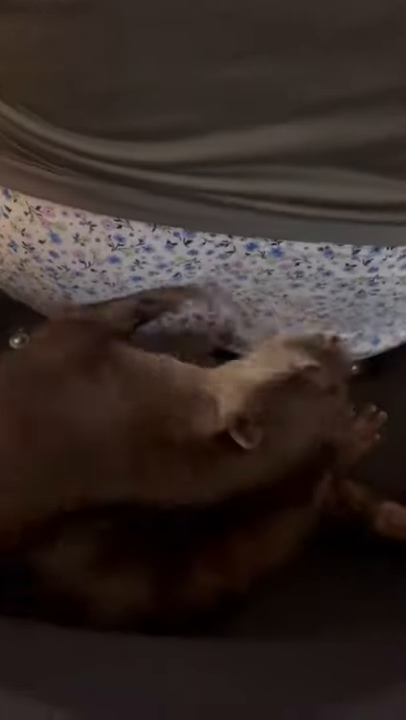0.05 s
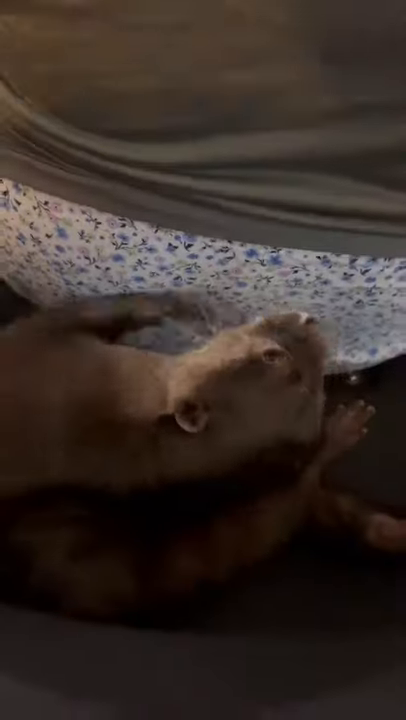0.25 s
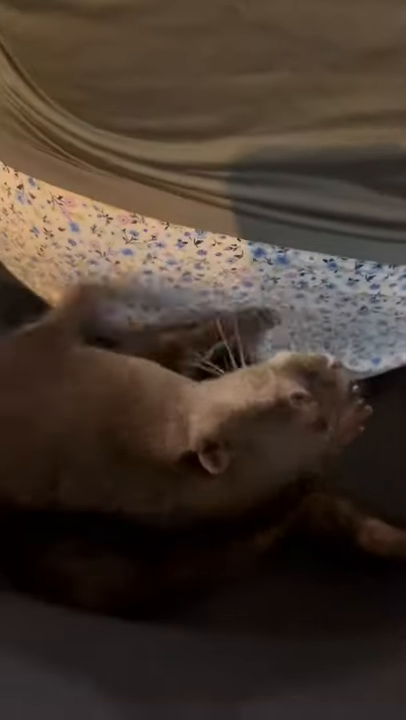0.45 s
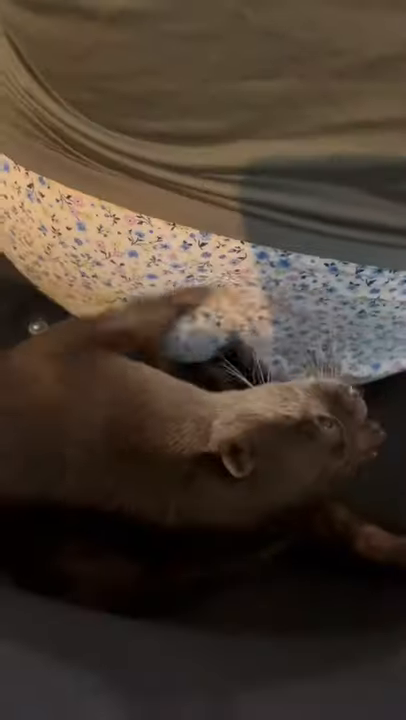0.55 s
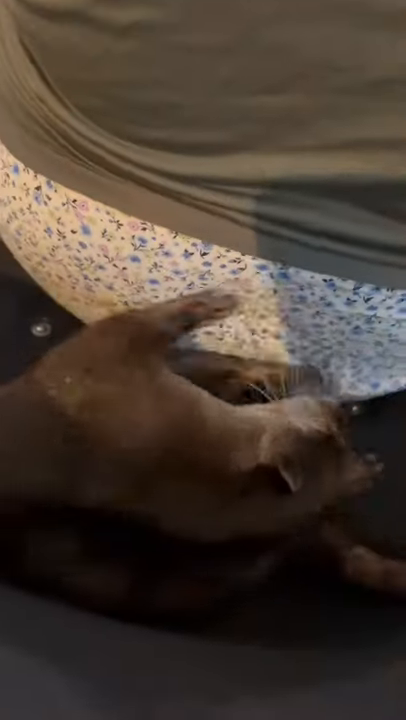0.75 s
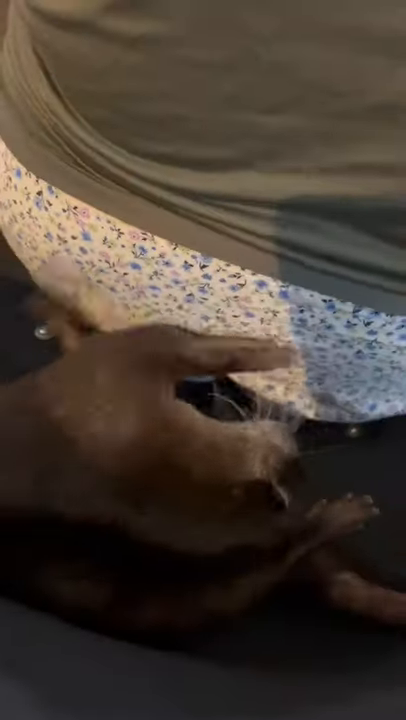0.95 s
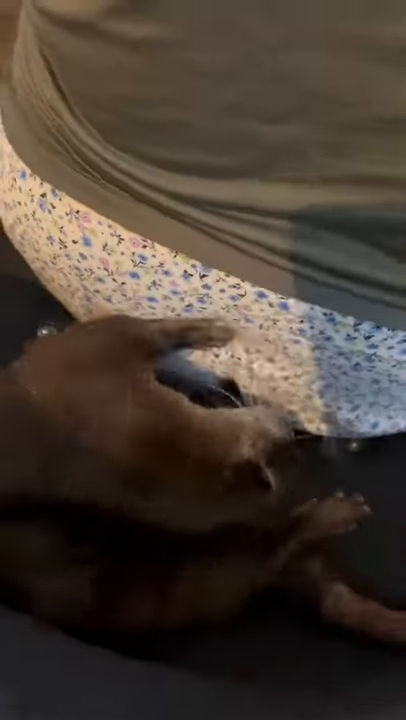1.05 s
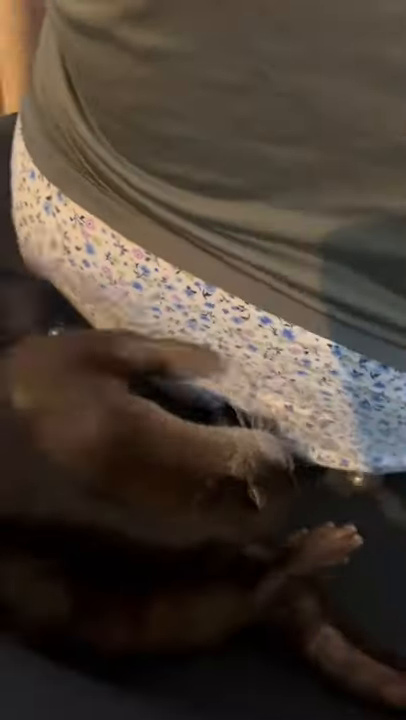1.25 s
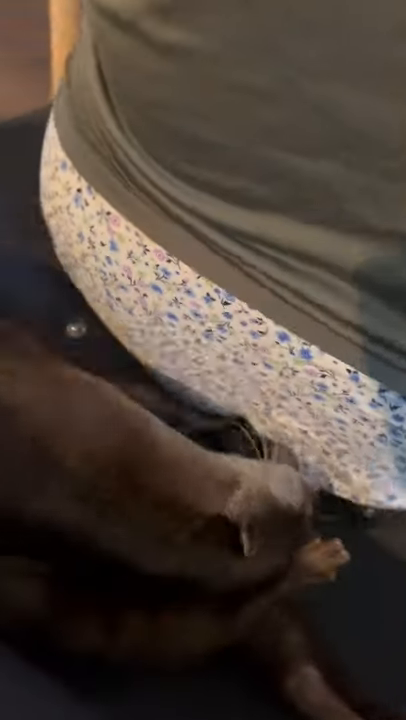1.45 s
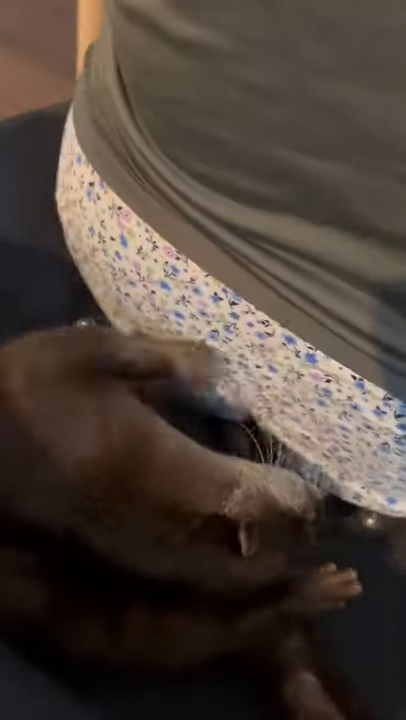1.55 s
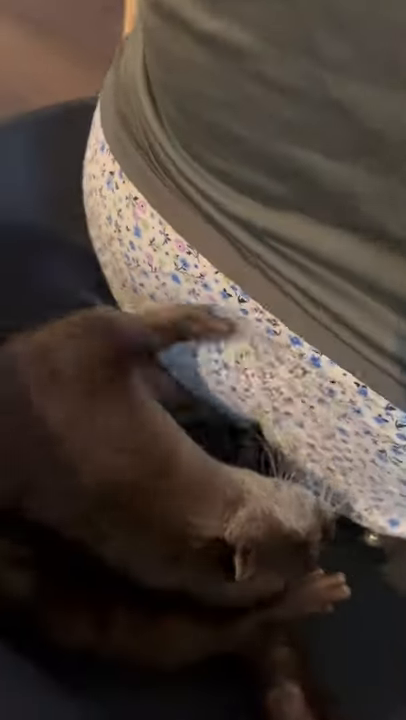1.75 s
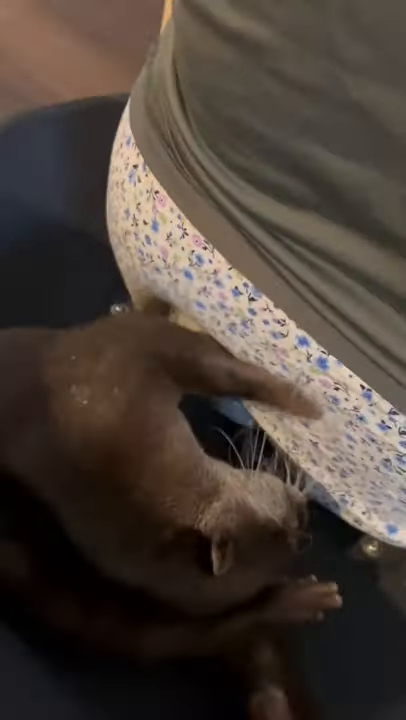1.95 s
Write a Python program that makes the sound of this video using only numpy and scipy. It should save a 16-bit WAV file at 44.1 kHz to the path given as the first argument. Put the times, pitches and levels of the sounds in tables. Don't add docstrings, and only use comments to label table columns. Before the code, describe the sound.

An otter squeals once near the start, rough then clear, with a short room echo; quiet fabric brushing follows, then soft pats and tiny claw ticks over low room hum, picked up by a close handheld phone.

```python
import sys
import numpy as np
from scipy import signal
from scipy.fft import rfft, irfft
from scipy.io import wavfile
from scipy.ndimage import uniform_filter1d

SR = 44100
rng = np.random.default_rng(int(sys.argv[2]) if len(sys.argv) > 2 else 0)


def level_to_linear(level):
    exponent = np.asarray(level, float) / 20
    return 10 ** exponent


def master(y):
    cut = np.clip(np.atleast_2d(y).T, -1, 1)
    pcm = np.round(cut * 32767)
    wavfile.write(sys.argv[1], SR, pcm.astype(np.int16))


N = 88200
T = np.arange(N) / SR

# freq_hz, level_db
AIR_COLOUR = [(40, -21), (150, -19), (500, -21.5), (1400, -29), (4400, -38.5), (7000, -40), (12500, -42),
              (16000, -41)]
# freq_hz, level_db
RUMBLE_COLOUR = [(25, -21), (45, -22), (70, 7.5), (95, -6), (125, 1.5), (200, -5.5), (450, -16), (800, -45)]
# time_s, level_db
SHIFTING = [(0, -80), (.17, -72.5), (.6, -68.5), (.87, -69.5), (.94, -66.5), (1.0, -75.5), (1.12, -67),
            (1.4, -67.5), (1.55, -59), (1.69, -62), (1.8, -59.5), (2, -60)]
# freq_hz, correlation_0_1
ALIKE = [(60, .99), (130, .95), (270, .7), (600, .5), (1200, .7), (3000, .5), (6500, .7), (12500, .85)]
AIR_DB = -67.5

# start_s, level_db, t60_s, dullness_db
PATS = [
    (1.456, -50, 0.67, -1.5),
    (1.558, -61.5, 0.65, 17),
    (1.701, -49.5, 1, -1.4),
    (1.813, -93, 1, 34),
]
# freq_hz, level_db
PAT_COLOUR = [(150, -52), (250, -44), (478, -30), (650, -5), (1530, -6), (3620, -10), (12000, -28.5),
              (15600, -70), (22000, -120)]
# start_s, peak_db, pitch_hz
TICKS = [
    (1.4655, -41, 3900),
    (1.4655, -43, 2500),
    (1.7135, -41, 1900),
    (1.714, -38, 3350),
    (1.779, -41, 3150),
    (1.788, -43, 3700),
]
# mid_s, length_s, mid_hz, climb_hz_per_s, level_db
FLICK = (1.7975, .007, 6400, 400000, -46)

# end_s, length_s, level_db, whistle_db, grip_db
STROKES = [
    (0.121, 0.11, -65, -24, 0.5),
    (0.621, 0.12, -58, -14.5, -15),
    (0.828, 0.098, -63.5, -28, -1),
    (0.957, 0.15, -61.5, -5, -35),
    (1.129, 0.087, -62, -26, 3.5),
    (1.257, 0.13, -61.5, -11, -1.5),
    (1.441, 0.12, -62.5, -13, 4),
    (1.616, 0.13, -59, -4.5, -16),
    (1.805, 0.095, -52.5, -6.5, -11.5),
    (1.968, .11, -60.5, -3, 0.5),
]
# freq_hz, level_db
CLOTH_COLOUR = [(800, -17), (2200, -9), (3570, -5.5), (4930, -8), (6980, -6), (10000, -12), (12500, -3),
                (16000, -20.5)]
SWELL_DB, STOP_S = -11, 0.0067
WHISTLE_LO_HZ, WHISTLE_HI_HZ, WHISTLE_WIDTH_HZ = 2540, 9240, 800
GRIP_BEFORE_S, GRIP_S, GRIP_HZ, GRIP_WIDTH_HZ = 0.03, 0.023, 4130, 1300
SEAM_S, SEAM_DB, SEAM_HZ, SEAM_WIDTH_HZ, SEAM_T60_S = 1.706, -57, 3300, 230, .8

# freq_hz, t60_s
WALL_DECAY = [(500, 0.99), (1000, 0.5), (2500, 0.54), (4000, 0.77), (7000, 0.16), (11000, 0.099)]
WALLS_DB, PATH_TURN_HZ = -25.5, 17

# time_s, pitch_hz, effort_db
START = [
    (.213, 549.5, -71),
    (.224, 546.2, -33.5),
    (.246, 610.3, -22.5),
    (.262, 585.6, -25.5),
    (.272, 493, -22),
    (.28, 524.3, -23.5),
    (.289, 598.4, -23),
    (.298, 629.2, -25),
]
# time_s, pitch_hz, effort_db
GROWL = [
    (0.308, 572, -22.5),
    (0.319, 560, -33.5),
    (0.331, 560, -28.5),
    (0.348, 538, -26.5),
    (.353, 519.7, -39),
    (0.36, 541.5, -26),
]
# time_s, pitch_hz, effort_db
NOTE = [
    (.372, 540.7, -24),
    (.388, 538, -24.5),
    (.395, 566, -23.5),
    (.414, 555.3, -23),
    (.436, 529.3, -23.5),
    (.46, 529.9, -22),
    (.481, 529, -25.5),
    (.488, 525, -39),
    (.503, 486, -54),
]
# time_s, roughness_0_1, half_pitch_0_1, mouth_opening_ratio
FOLDS = [
    (0.213, 0.12, 0.18, 0.85),
    (0.261, 0.25, 0.31, 0.97),
    (0.288, 0.29, 0.08, 1),
    (0.303, 0.8, 0.98, 1),
    (0.361, 0.45, 0.7, 1.037),
    (0.381, 0.2, 0, .99),
    (0.401, 0.09, 0, 1.041),
    (0.485, 0.09, 0.05, 1.117),
    (0.497, 0.54, 0.2, 0.8),
]
# freq_hz, width_hz, level_db, gain_when_clear_db
THROAT = [(270, 69, -52, -9.5), (560, 304, -60.5, -5.3), (970, 580, -8, 0.2), (2322, 935, -1, 3.33),
          (2554, 795, 3.5, -0.86), (3482, 970, -6.5, 3.5), (3560, 490, -22.5, 15), (4116, 150, -10, -8),
          (6014, 830, -17.5, 6), (7150, 770, -25, -5.5), (8000, 1200, -25.5, -2.5),
          (9550, 1900, -31.5, 1.3), (12800, 4000, -35, -3)]
# freq_hz, width_hz, level_db
POCKETS = [(5250, 400, -12), (9150, 450, -13), (11500, 900, -8)]
# mid_s, length_s, level_db
SPURTS = [
    (0.246, .008, -12),
    (0.268, .009, 6),
    (0.283, .006, 0.5),
    (0.304, .007, 4),
    (0.316, .005, 9.5),
    (0.327, .007, 9),
    (0.35, .006, 5.5),
    (.356, .004, 8),
    (0.372, .008, 5),
    (0.387, .01, 5),
]
# end_s, start_s, end_hz, start_hz, level_db
SLIDE = (0.3651, 0.3628, 682, 1247.5, -36.5)
# mid_s, length_s, pitch_hz, level_db
LOW_SWELLS = [
    (0.315, 0.025, 235.6, -43.5),
    (0.333, 0.014, 288.6, -39.5),
    (0.35, 0.0092, 270, -33),
    (0.362, 0.0078, 254.3, -37.5),
    (0.408, 0.079, 235.5, -54),
    (0.498, 0.025, 465, -51),
]
JITTER, PUFF_SHARE, RASP, DISPERSION_RAD = .12, .42, .22, .02
VOICE_DB, LOW_THIRD_DB = -0.96, 1.5
BRIGHT_DB, SHIMMER_DB = 30, 1.6
CLEAR_FROM_S, CLEAR_TO_S = 0.34, 0.36

# freq_hz, phase_rad
NEAR_PHASE = [(250, 0), (860, 3.1), (1720, 3.6), (1980, 5.5), (3790, 4.6), (5600, 6.2), (8900, 5.5),
              (12000, 3.1)]
# freq_hz, level_db
NEAR_PAN = [(200, 4.5), (350, -9), (600, 12.5), (1150, 14.5), (2090, -1.5), (2700, -5), (3770, 1),
            (6810, 3.5)]
# freq_hz, phase_rad
WIDE_PHASE = [(260, 0), (520, 2.8), (1380, 2.7), (3960, 5.5), (4910, 3.5), (5600, 6.3), (9220, 5.3),
              (13200, 3.1)]
# freq_hz, level_db
WIDE_PAN = [(60, 1.5), (350, 0), (2090, 0.0), (12300, 0)]
MID_EDGE_HZ, SIDE_GAP_LO_HZ, SIDE_GAP_HI_HZ = 12750, 5900, 7300


def evened(x):
    return x / np.sqrt(np.mean(x ** 2) + 1e-20)


def read(points, hz):
    f, value = np.transpose(points)
    return np.interp(np.log(hz + 1), np.log(f + 1), value)


def drift(count, size):
    once = uniform_filter1d(rng.standard_normal(count), size=size)
    return evened(uniform_filter1d(once, size=size))


def bump(mid_s, length_s, t=T):
    return np.exp(-(2 * (t - mid_s) / length_s) ** 2)


def resonate(x, hz, width_hz):
    turn = np.exp(2j * np.pi * np.cumsum(hz * np.ones(len(x))) / SR)
    r = np.exp(-np.pi * width_hz / SR)
    return 2 * (turn * signal.lfilter([(1 - r) ** 2], [1, -2 * r, r * r], x / turn + 1e-18)).real


def hiss(colour, patchy_db, size=512):
    hz = np.fft.rfftfreq(size, 1 / SR)
    a, b, c, d, patches = rng.standard_normal((4 * N // size + 5, len(hz), 5)).T
    patches = uniform_filter1d(patches, size=6, axis=0)
    patches = evened(uniform_filter1d(patches, size=5120 // size, axis=1))
    same = np.clip(read(ALIKE, hz), 0, 1)[:, None]
    left = a + 1j * b
    right = same * left + np.sqrt(1 - same ** 2) * (c + 1j * d)
    z = np.array([left, right]) * level_to_linear(read(colour, hz)[:, None] + patchy_db * patches)
    return evened(signal.istft(z, nperseg=size, noverlap=3 * size // 4)[1][:, :N])


def room():
    rumble = hiss(RUMBLE_COLOUR, patchy_db=2.5, size=2048)
    air = hiss(AIR_COLOUR, patchy_db=-0.5, size=1024)
    shift_db = np.interp(T, *np.transpose(SHIFTING))
    return level_to_linear(AIR_DB + 0.49 * (shift_db + 72.5)) * air + level_to_linear(shift_db) * rumble


def pats():
    bright = hiss(PAT_COLOUR, patchy_db=4.0)
    hollow = [(250, -21.0), (500, -10.5), (690, 0.0), (900, -12), (2500, -36.5)]  # freq_hz, level_db
    dull = hiss(hollow, patchy_db=2.0)
    out = np.zeros((2, N))
    for start_s, db, t60_s, dull_db in PATS:
        t = np.maximum(T - start_s, 0)
        rise = np.minimum(t / .007, 1)
        out += rise * level_to_linear(db - 60 * t / t60_s) * (bright + level_to_linear(dull_db - 6.5) * dull)
    return out


def claws():
    out = np.zeros(N)
    for start_s, db, tick_hz in TICKS:
        t = np.maximum(T - start_s, 0)
        out += level_to_linear(db - 60 * t / .009) * np.sin(2 * np.pi * tick_hz * t)
    mid_s, length_s, mid_hz, climb, db = FLICK
    t = T - mid_s
    out += level_to_linear(db) * bump(mid_s, length_s) * np.sin(2 * np.pi * (mid_hz + climb * t / 2) * t)
    return out * np.array([[1], [.3]])


def strokes():
    weave = hiss([(20, 0), (20000, 0)], patchy_db=1)
    fibres = hiss(CLOTH_COLOUR, patchy_db=3.5)
    pads = evened(np.array([resonate(w[::-1], GRIP_HZ, GRIP_WIDTH_HZ) for w in weave]))
    grit = level_to_linear(1.4 * evened(uniform_filter1d(rng.standard_normal(N), size=90)))
    out = np.zeros((2, N))
    for end_s, length_s, db, whistle_db, grip_db in STROKES:
        i, j = max(round((end_s - 2 * length_s) * SR), 0), round(end_s * SR)
        t = T[i:j] - end_s
        u = t / length_s + 1
        travel = np.clip(u, 0, 1)
        level = level_to_linear(db + SWELL_DB * np.maximum(.8 - u, 0)) * np.clip(-t / STOP_S, 0, 1)
        grip = level_to_linear(grip_db) * np.exp(-((t + GRIP_BEFORE_S) / GRIP_S) ** 2)
        hz = WHISTLE_LO_HZ + (WHISTLE_HI_HZ - WHISTLE_LO_HZ) * travel ** 4.7
        whistle = evened(np.array([resonate(w[i:j], hz, WHISTLE_WIDTH_HZ) for w in weave])) * travel
        rub = (1 + grip) * fibres[:, i:j] + 1.1 * grip * pads[:, i:j]
        out[:, i:j] += level * grit[i:j] * (rub + level_to_linear(whistle_db + 5) * whistle)
    seam = evened(np.array([resonate(w, SEAM_HZ, SEAM_WIDTH_HZ) for w in weave]))
    fade_db = -60 * np.maximum(T - SEAM_S, 0) / SEAM_T60_S
    return out + seam * (T > SEAM_S) * level_to_linear(SEAM_DB + fade_db)


def walls(x):
    taps, out = np.zeros((2, SR)), 0
    at = np.arange(300, SR - 20, 20)
    spots = at + rng.integers(0, 20, (2, len(at)))
    np.put_along_axis(taps, spots, rng.choice([-1., 1.], (2, len(at))), 1)
    taps[1] = 0.2 * taps[0] + 1.0 * taps[1]
    for k in range(3):
        path = np.roll(taps, k * SR // 3, axis=1) * (np.arange(SR) >= 300)
        hz, t, z = signal.stft(path, SR, nperseg=256)
        decay = level_to_linear(-60 * t / read(WALL_DECAY, hz)[:, None])
        tail = signal.istft(z * decay, SR, nperseg=256)[1]
        tail = tail / np.linalg.norm(tail[0])
        share = np.sqrt(2 / 3) * np.cos(2 * np.pi * (PATH_TURN_HZ * T + k / 3))
        out = out + signal.fftconvolve((x * share)[None], tail, axes=1)[:, :N]
    return level_to_linear(WALLS_DB) * out


def low_swells():
    out = np.zeros(N)
    for mid_s, length_s, hz, db in LOW_SWELLS:
        third = level_to_linear(LOW_THIRD_DB) * (mid_s < NOTE[0][0]) * np.cos(6 * np.pi * hz * T)
        out += level_to_linear(db) * bump(mid_s, length_s) * (np.cos(2 * np.pi * hz * T) + third)
    return out


def loose_fold():
    end_s, start_s, end_hz, start_hz, db = SLIDE
    u = np.clip((T - end_s) / (start_s - end_s), 0, 1)
    hz = end_hz + (start_hz - end_hz) * np.sin(np.pi * u / 2)
    return level_to_linear(db) * np.sin(np.pi * u) * np.cos(2 * np.pi * np.cumsum(hz) / SR)


def vocal_folds(t, pitch_hz, rough, half):
    hz = uniform_filter1d(pitch_hz, size=120) * (1 + JITTER * rough * drift(len(t), 80))
    turns = np.cumsum(hz) / SR
    pulses = 0
    for k in range(1, 52):
        phase = np.pi * k * turns + DISPERSION_RAD * k * k * (.5 + k % 2)
        pulses = pulses + (half if k % 2 else 1) * np.cos(phase)
    puffs = evened((.3 + np.exp(-(turns % 1))) * rng.standard_normal(len(t)))
    drive = (1 - PUFF_SHARE * rough) * evened(pulses) + PUFF_SHARE * rough * puffs
    return drive, RASP * puffs


def throat(t, drive, rasp, mouth):
    clear = np.clip((t - CLEAR_FROM_S) / (CLEAR_TO_S - CLEAR_FROM_S), 0, 1)
    spurt_db = sum(db * bump(mid_s, length_s, t) for mid_s, length_s, db in SPURTS)
    voice = 0
    for k, (hz, width_hz, db, clear_db) in enumerate(THROAT):
        high = np.clip(hz / 5000 - .3, 0, 1)
        bright_db = BRIGHT_DB * (mouth - 1) + SHIMMER_DB * drift(len(t), 400)
        gain = level_to_linear(db + clear_db * clear + high ** 2 * spurt_db + high * bright_db)
        ring = resonate(drive + high * rasp, hz * mouth ** (1 - .6 * high), width_hz)
        voice = voice + (-1) ** k * gain * ring
    return voice / np.sqrt(uniform_filter1d(voice ** 2, size=600) + 1e-12)


def otter():
    s, pitch, effort_db = np.transpose(list(START) + list(GROWL) + list(NOTE))
    t = np.arange(s[0], s[-1], 1 / SR)
    at, *state = np.transpose(FOLDS)
    rough, half, mouth = (np.interp(t, at, v) for v in state)
    drive, rasp = vocal_folds(t, np.interp(t, s, pitch), rough, half)
    voice = throat(t, drive, rasp, mouth)
    out = np.zeros(N)
    out[round(s[0] * SR):][:len(t)] = voice * level_to_linear(VOICE_DB + np.interp(t, s, effort_db))
    bins = np.fft.rfftfreq(N, 1 / SR)
    pocket_db = sum(db * np.exp(-((bins - hz) / width_hz) ** 2) for hz, width_hz, db in POCKETS)
    return irfft(rfft(out) * level_to_linear(pocket_db), N) + loose_fold() + low_swells()


def ports(x, phase, pan):
    hz, sign = np.fft.rfftfreq(N, 1 / SR), np.array([[.5], [-.5]])
    return irfft(rfft(x) * level_to_linear(sign * read(pan, hz)) * np.exp(1j * sign * read(phase, hz)), N)


def scene():
    call = otter()
    around = room() + pats() + claws() + strokes() + walls(call)
    return ports(around, WIDE_PHASE, WIDE_PAN) + ports(call[None], NEAR_PHASE, NEAR_PAN)


def band_limit(x):
    return signal.sosfilt(signal.butter(12, 15750, fs=SR, output="sos"), x)


def record(dry):
    hz, (left, right) = np.fft.rfftfreq(N, 1 / SR), rfft(dry)
    top = np.clip((hz - MID_EDGE_HZ) / 500, 0, 1)
    gap = np.clip(np.minimum(hz - SIDE_GAP_LO_HZ, SIDE_GAP_HI_HZ - hz) / 200 + 1, 0, 1)
    mid = (left + right) / 2 * level_to_linear(-35 * top)
    side = (left - right) / 2 * level_to_linear(-22 * gap)
    mix = irfft([mid + side, mid - side], N)
    return band_limit(mix)


dry = scene()
out = record(dry)
master(out)
```